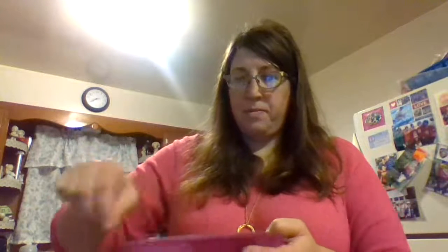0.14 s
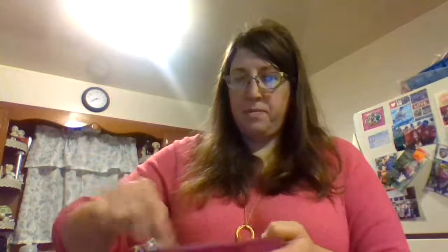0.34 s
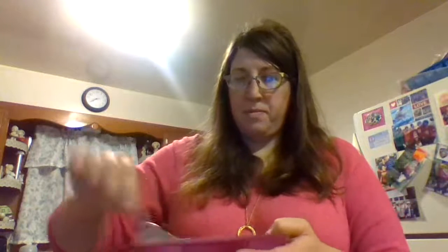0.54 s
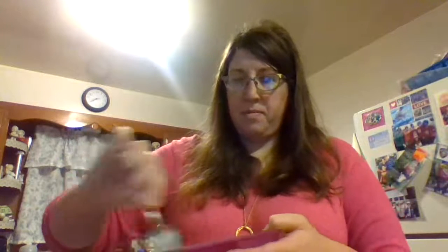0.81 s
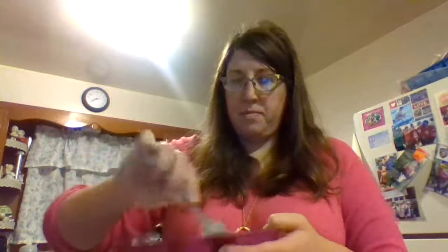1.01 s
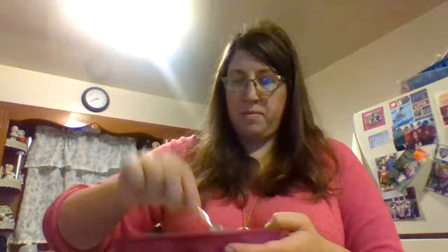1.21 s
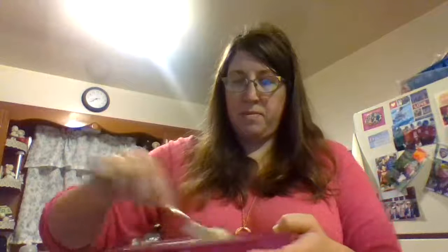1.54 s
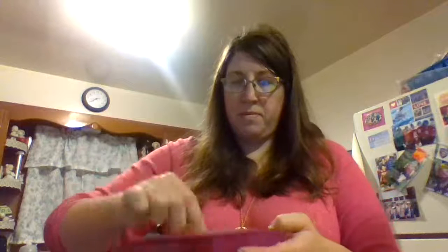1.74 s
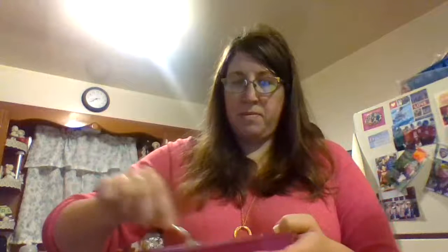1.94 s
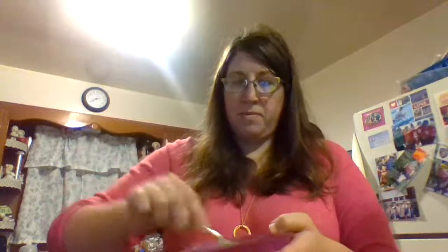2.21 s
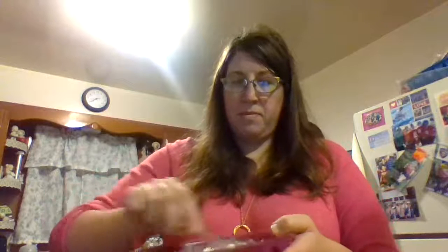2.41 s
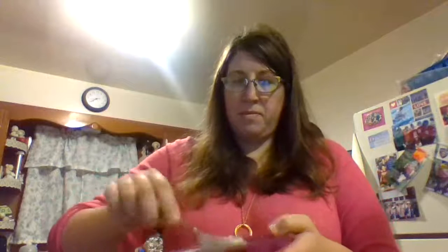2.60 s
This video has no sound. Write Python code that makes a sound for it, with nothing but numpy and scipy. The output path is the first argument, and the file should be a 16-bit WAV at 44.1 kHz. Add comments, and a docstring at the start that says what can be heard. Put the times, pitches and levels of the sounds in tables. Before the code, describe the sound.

A metal spoon scrapes stiff dough in a plastic bowl, close up. Three quick rasping strokes crowd the first 0.5 seconds, with knocks and the strongest bright scrape near 0.35. Strokes follow at 0.65, 0.8-1.1 and 1.3-1.5, a faint one near 1.7, a firm lower one at 1.9, a long one from 2.2 to 2.5, then a knock and brief scrape at 2.7. Tiny pops, short room reflections, faint hum and thin whine.

```python
"""A metal spoon works stiff dough in a plastic bowl, close up: strokes built from dense runs of tiny random slips.
The slips excite bowl colour, a wall resonance, two gliding rasp resonances, the spoon's ring and a bright hiss.
Enveloped noise and damped sines make the spoon knock on the bowl; damped sines pop as air pockets in the dough.
Short decaying noise gives the small kitchen's answer, over coloured room noise and a thin whine of wavering sines."""
import sys
import numpy as np
from scipy import signal
from scipy.fft import rfft, irfft, next_fast_len
from scipy.io import wavfile
from scipy.ndimage import uniform_filter1d, map_coordinates

SR = 44100
rng = np.random.default_rng(int(sys.argv[2]) if len(sys.argv) > 2 else 0)


def file_out(sig):
    """Save sig as 16-bit WAV at sys.argv[1]."""
    # one column per channel
    cols = np.atleast_2d(sig).T
    # limit, then scale
    lim = np.clip(cols, -1, 1)
    pcm = np.round(lim * 32767).astype(np.int16)
    wavfile.write(sys.argv[1], SR, pcm)


N = 121275

# loudness curve of each stroke, one list per stroke: t/s, body level/dB, hiss level/dB
STROKE_CURVES = [
    [(0.0, -51.5, -56), (0.014, -58.5, -57), (0.052, -47.5, -49), (0.066, -45.5, -41), (0.082, -41, -40),
     (0.12, -48, -52), (0.142, -81, -63), (0.15, -55, -51)],
    [(0.172, -49, -43), (0.178, -41, -43.5), (0.19, -42.5, -35.5), (0.202, -41, -44.5), (0.236, -51, -50),
     (0.247, -43, -48)],
    [(0.247, -54, -45), (0.257, -46, -47), (0.295, -34, -34.5), (0.349, -33, -26), (0.357, -31, -25),
     (0.365, -47, -39.5), (0.397, -41, -43), (0.443, -59, -60), (0.47, -56.5, -60)],
    [(0.657, -50, -41.5), (0.667, -40.5, -43), (0.711, -47, -50.5), (0.737, -59, -66), (0.755, -62, -71)],
    [(0.765, -67, -74), (0.777, -50, -48.5), (0.799, -52, -54), (0.819, -43, -44.5), (0.849, -45, -40),
     (0.915, -46.5, -47), (0.983, -41, -41.5), (0.997, -47.5, -47), (1.025, -42.5, -42.5),
     (1.093, -45, -51), (1.13, -86, -80)],
    [(1.28, -78, -59), (1.286, -62, -64), (1.302, -58, -67), (1.38, -49.5, -53.5), (1.388, -37.5, -47.5),
     (1.424, -46.5, -52), (1.46, -41, -41.5), (1.5, -73, -66.5), (1.51, -73, -61)],
    [(1.645, -69, -68), (1.651, -60, -78), (1.669, -61.5, -60), (1.681, -53, -58), (1.717, -66, -60.5),
     (1.733, -46, -45.5), (1.741, -50, -56), (1.785, -60.5, -64)],
    [(1.83, -63, -64), (1.852, -47.5, -64), (1.87, -45, -52), (1.912, -35.5, -46), (1.928, -39.5, -38),
     (1.964, -36, -42), (1.97, -36, -42), (2.016, -52, -57), (2.06, -81, -87)],
    [(2.196, -43.5, -51), (2.208, -41.5, -43), (2.218, -42, -43), (2.292, -44.5, -51), (2.328, -47, -45.5),
     (2.334, -39.5, -47.5), (2.366, -45, -50), (2.462, -39.5, -45), (2.544, -60, -59), (2.558, -78, -82),
     (2.57, -62, -68)],
    [(2.708, -38.5, -50), (2.732, -55.5, -52), (2.75, -49, -52)],
]
# where each stroke touches the bowl, one row per stroke: wall f/Hz, wall width/Hz, wall level/dB,
# rasp start f/Hz, rasp middle f/Hz, rasp end f/Hz, rasp level/dB, upper rasp level re rasp/dB,
# low body level/dB, spoon ring level/dB, fizz level/dB, slip roughness/dB
STROKE_CONTACTS = [ (1130, 230, -4.5, 2550, 2380, 480, 13, -7.5, -17, -3.5, -0.5, -2.5),
                   (1220, 150, 5.5, 2400, 2000, 2150, 14, -4, -4, 4, -5, 4),
                   (1150, 180, 3, 2400, 2190, 1900, 0.5, 5.5, -15, -1.5, -10, 2.2),
                   (1004, 220, 0.5, 2140, 2660, 800, 3.5, -2, -7, 6, 3.5, 1.5),
                   (1180, 320, 4, 2150, 2280, 2190, 10.5, -5.5, -5.5, -2.5, -6, 4),
                   (1002, 78, -7.5, 3640, 2410, 2700, 4.5, -15, -23, -7, -2, 4),
                   (1010, 200, -6, 3500, 2900, 2530, -2.5, -2.5, -15, -7, -7, 4.5),
                   (1040, 260, -3, 2470, 2560, 1670, 2.5, 1.5, -22, -4, -2.5, 4.5),
                   (960, 350, 0.5, 2390, 2730, 2670, 4, -4.5, -8.5, -5, -3.5, 2.5),
                   (1060, 87, 1, 2450, 1800, 4000, 12, -22, -8, -1, -4, 3.5)]
# spoon resonances, shifted by the clinging dough, one list per stroke: f/Hz, width before damping/Hz, level/dB
SPOON_MODES = [
    [(5560, 44, 1), (9720, 43, -13), (11350, 92, 17), (12300, 120, 3)],
    [(5860, 50, -13), (6370, 58, -6), (8200, 190, 3), (10800, 75, -6), (11750, 47, 7.5)],
    [(4500, 34, 8.5), (6380, 99, 3.5), (8800, 290, -6), (9200, 41, -8), (11600, 47, -5), (11270, 64, 6.5),
     (11900, 46, 1.5)],
    [(3840, 26, 8), (4560, 29, 19), (4940, 36, -26), (6900, 23, -17)],
    [(5800, 280, -1), (7080, 51, 0), (9700, 41, -19), (12180, 50, 7.5), (12800, 36, -7)],
    [(6400, 110, -1), (8040, 120, -4), (11100, 39, 3), (11200, 88, 0)],
    [(5050, 76, -8), (6250, 160, -11), (8860, 36, -4)],
    [(4600, 62, 5), (5040, 46, -11), (5650, 36, -17), (9760, 62, 5.5)],
    [(4350, 260, 22), (5150, 38, 2), (8100, 23, -9)],
    [(4860, 40, -2), (6100, 44, -5)],
]
# colour of friction in the bowl: f/Hz, level/dB
BOWL_COLOUR = [(500, -64), (850, -15), (1000, 5.5), (1350, 1.5), (1600, 2), (2400, 2.5), (3300, -0.5),
               (4000, -1), (5200, -14), (8000, -81)]
# colour of the low body of a stroke: f/Hz, level/dB
LOW_BODY_COLOUR = [(100, -40), (260, -50.5), (400, 1), (600, 4.5), (850, 5), (1200, -24)]
# colour of the bright friction hiss: f/Hz, level/dB
HISS_COLOUR = [(2800, -59.5), (4100, -10), (4900, 0.5), (6400, 1.5), (7600, -2.5), (8600, -2.5),
               (10000, -3.5), (13000, -4), (15500, -11.5)]
# colour of the fizz at the very top: f/Hz, level/dB
FIZZ_COLOUR = [(7000, -40), (10200, -3.5), (11300, -2.5), (12200, -3.5), (13500, -5.5), (15500, -13)]
# spoon meets bowl: t/s, thump level/dB, clack level/dB, crack level/dB
KNOCK_EVENTS = [ (0.1764, -66, -27.5, -28.5), (0.246, -35, -33.5, -28.5), (.654, -49, -31, -31),
                (.853, -61, -34, -32), (1.39, -68, -34.5, -42), (1.442, -64, -46, -51),
                (1.4593, -73, -33.5, -49), (1.487, -63, -45, -48), (1.9, -81, -37, -59),
                (1.914, -73, -50, -34), (1.958, -62, -29, -43), (2.1947, -37, -34.5, -33),
                (2.7025, -37, -30.5, -29.5)]
# modes of the bowl's bottom: f/Hz, level/dB, t60/s
BOTTOM_MODES = [(70, -14.5, 0.055), (166, -0.5, .022), (358.6, 0, 0.054), (436, 2.5, 0.019),
                (612, -3.5, .03), (830, -13, 0.074)]
# air pockets opening: t/s, level/dB
POP_EVENTS = [(1.288, -42), (1.5743, -29.5), (1.649, -40)]
# modes of an air pocket: f/Hz, level/dB, t60/s
POCKET_MODES = [(1130, -12.5, 0.052), (1350, -2.5, 0.011), (1820, -0.5, 0.0047), (2280, 4, 0.0039),
                (3180, -6.5, 0.0036)]
# decay of the kitchen: f/Hz, t60/s
KITCHEN_DECAY = [(200, 0.41), (1000, 0.44), (3000, 0.22), (12000, 0.21)]
# colour of the room noise: f/Hz, level/dB
ROOM_COLOUR = [(15, -39), (25, 2.5), (66, 0), (274, -13), (552, -10), (782, -16), (1620, -21), (1750, -23),
               (1950, -18.5), (4620, -25), (5140, -23.5), (5580, -21.5), (7100, -26.5), (7700, -19.5),
               (8810, -22), (9550, -19.5), (11500, -19), (13200, -13.5), (15500, -22)]
# partials of the electronic whine: f/Hz, rms level/dB
WHINE_PARTIALS = [(5206, -73.5), (7811, -72), (8000, -76), (9109, -67), (10411, -91), (11714, -60.5),
                  (13017, -59.5)]

SLIPS_PER_S = 6000
STICK_DB, STICK_PER_S = 0.06, 160  # depth and rate of the stick-slip waver
RASP_WIDTH_HZ, UPPER_RATIO = 634, 1.336  # width of each filter pass; upper rasp pitch over rasp pitch
WALL_GROWS = 0.18  # dB of extra wall ring for each dB of pressure
DOUGH_DAMPING_HZ = 190  # added to each spoon resonance width
PATCHY_DB = 2.5
CLACK_T60_S, CRACK_T60_S, KNOCK_ATTACK_S = .024, .014, .0009
CHATTER_DB, CHATTER_T60_S = -44, .1  # starting level relative to the clack or crack
POP_ATTACK_S = .0003
KITCHEN_DB, FIRST_ECHO_S = -11.5, .003
ROOM_DB = -56.5
WHINE_WAVER_RAD, WHINE_WAVER_PER_S = 0.14, 14
TOP_HZ = 15830


def amp(db):
    """Turn decibels into a gain."""
    return 10 ** (np.asarray(db) / 20)


def unit(x):
    """Bring x to rms 1."""
    return x / np.sqrt(np.mean(x ** 2) + 1e-20)


def along(points, hz):
    """Read a curve of (Hz, value) points on a log frequency axis."""
    point_hz, value = np.transpose(points)
    return np.interp(np.log(hz + 1), np.log(point_hz + 1), value)


def wobble(rate, n):
    """A smooth random curve, rate knots a second."""
    return map_coordinates(rng.standard_normal(2048), [np.arange(n) * rate / SR], mode="wrap")


def filtered(x, response):
    """Shape x with a complex response of frequency."""
    n = x.shape[-1]
    padded = 2 * next_fast_len(n // 2 + 2048)
    spectrum = rfft(x, padded) * response(np.fft.rfftfreq(padded, 1 / SR))
    return irfft(spectrum, padded)[..., :n]


def coloured(x, points):
    """Colour x causally from (Hz, dB) points, at rms 1."""
    def response(hz):
        """Fold the cepstrum forward in time for a minimum-phase response."""
        cepstrum = irfft(np.log(amp(along(points, hz))))
        middle = len(cepstrum) // 2
        cepstrum[1:middle] *= 2
        cepstrum[middle + 1:] = 0
        return np.exp(rfft(cepstrum))
    return unit(filtered(x, response))


def resonant(x, peaks):
    """Ring x through parallel (Hz, width Hz, dB) resonances, at rms 1."""
    def response(hz):
        """Sum the band-pass response of each damped resonator."""
        return sum(amp(db) * 1j * hz * width / (centre ** 2 - hz ** 2 + 1j * hz * width)
                   for centre, width, db in peaks)
    return unit(filtered(x, response))


def ring(modes, t):
    """Sum damped sines from (Hz, dB, t60 s) rows."""
    return sum(amp(db - 60 * t / t60) * np.sin(2 * np.pi * hz * t) for hz, db, t60 in modes)


def add(out, s, x):
    """Mix x into out at s seconds."""
    i = max(round(s * SR), 0)
    out[i:i + len(x)] += x[:max(N - i, 0)]


def scrapes():
    """The spoon drags dough along the wall; sticking and slipping excites bowl and spoon."""
    out = np.zeros(N)
    for curve, contact, spoon in zip(STROKE_CURVES, STROKE_CONTACTS, SPOON_MODES):
        wall_hz, width_hz, wall_db, *path_hz, rasp_db, upper_db, low_db, spoon_db, fizz_db, rough_db = contact
        s, body_db, hiss_db = np.transpose(curve)
        t = np.arange(s[0], s[-1], 1 / SR)

        def rub(colour):
            """A fresh run of slips takes on one colour of friction."""
            return coloured(slips(len(t), rough_db), colour)

        rasp = gliding(rub(BOWL_COLOUR), path_hz)
        rasp = rasp + amp(upper_db) * gliding(rub(BOWL_COLOUR), UPPER_RATIO * np.array(path_hz))

        # the body level stands for pressure: the wall rings more under a harder push
        pressure_db = np.interp(t, s, body_db) - body_db.max()
        wall = resonant(rub(BOWL_COLOUR), [(wall_hz, width_hz, 0)])
        wall = wall * unit(amp(WALL_GROWS * pressure_db))
        low = rub(LOW_BODY_COLOUR)
        body = unit(rub(BOWL_COLOUR) + amp(wall_db) * wall + amp(rasp_db) * rasp + amp(low_db) * low)

        damped = [(hz, width + DOUGH_DAMPING_HZ, db) for hz, width, db in spoon]
        spoon_ring = resonant(rub(HISS_COLOUR), damped)
        fizz = rub(FIZZ_COLOUR)
        hiss = unit(rub(HISS_COLOUR) + amp(spoon_db) * spoon_ring + amp(fizz_db) * fizz)

        stick = unit(amp(STICK_DB * wobble(STICK_PER_S, len(t))))
        body = amp(np.interp(t, s, body_db)) * body
        hiss = amp(np.interp(t, s, hiss_db)) * hiss
        add(out, s[0], stick * (body + hiss))
    return patchy(out)


def slips(n, rough_db):
    """Tiny slips let go at random moments; a few are much larger than the rest."""
    happens = rng.random(N) < SLIPS_PER_S / SR
    size = amp(rough_db * np.minimum(rng.exponential(size=N), 4))
    direction = rng.choice([-1, 1], N)
    return (happens * size * direction)[:n]


def gliding(x, path_hz, count=7):
    """A steep resonance moves through the given pitches, as a cross-fade of fixed ones."""
    place = np.linspace(0, count - 1, len(x))
    stops = np.interp(np.linspace(0, 1, count), np.linspace(0, 1, len(path_hz)), path_hz)
    out = np.zeros(len(x))
    for k, hz in enumerate(stops):
        peak = [(hz, RASP_WIDTH_HZ, 0)]
        steep = resonant(resonant(x, peak), peak)  # two passes steepen the slopes
        out += np.maximum(1 - abs(place - k), 0) * steep
    return unit(out)


def patchy(x):
    """The colour shifts at random over time and frequency as the contact wanders."""
    z = signal.stft(x, nperseg=256)[2]
    field = uniform_filter1d(rng.standard_normal(z.shape), size=3, axis=0)  # smooth over frequency
    field = uniform_filter1d(field, size=14, axis=1)  # smooth over time
    return signal.istft(z * amp(PATCHY_DB * unit(field)), nperseg=256)[1][:len(x)]


def knocks():
    """Each contact thumps the bowl's bottom, clacks its wall, cracks brightly and trails off in a short chatter."""
    out, t = np.zeros(N), np.arange(SR // 4) / SR
    chatter = amp(CHATTER_DB - 60 * t / CHATTER_T60_S)
    cushion = 1 - np.exp(-t / KNOCK_ATTACK_S)  # dough softens the blow
    for s, thump_db, clack_db, crack_db in KNOCK_EVENTS:
        thump = ring(BOTTOM_MODES, t)
        clack = coloured(rng.standard_normal(len(t)), BOWL_COLOUR)
        clack = clack * (amp(-60 * t / CLACK_T60_S) + chatter)
        crack = coloured(rng.standard_normal(len(t)), HISS_COLOUR)
        crack = crack * (amp(-60 * t / CRACK_T60_S) + chatter)
        add(out, s, cushion * (amp(thump_db) * thump + amp(clack_db) * clack + amp(crack_db) * crack))
    return out


def pops():
    """Small air pockets ring briefly as they open when the dough pulls away."""
    out, t = np.zeros(N), np.arange(SR // 10) / SR
    attack = 1 - np.exp(-t / POP_ATTACK_S)
    for s, db in POP_EVENTS:
        add(out, s, amp(db) * ring(POCKET_MODES, t) * attack)
    return out


def kitchen(x):
    """The room answers with short decaying noise, a little different for each stroke as the arm moves."""
    out = np.zeros(N)
    starts = [round(max(curve[0][0], 0) * SR) for curve in STROKE_CURVES[1:]]
    for i, part in zip([0] + starts, np.split(x, starts)):
        hz, t, z = signal.stft(rng.standard_normal(SR // 2), SR, nperseg=256)
        decay = amp(-60 * t / along(KITCHEN_DECAY, hz)[:, None])
        tail = signal.istft(z * decay, SR, nperseg=256)[1]
        tail = tail / np.linalg.norm(tail)
        add(out, i / SR + FIRST_ECHO_S, signal.fftconvolve(part, tail))
    return out


def room_noise():
    """Steady noise of the room: coloured random noise."""
    return amp(ROOM_DB) * coloured(rng.standard_normal(N), ROOM_COLOUR)


def whine():
    """Thin whine of the electronics: steady sines whose phases waver slightly."""
    t, out = np.arange(N) / SR, np.zeros(N)
    for hz, db in WHINE_PARTIALS:
        waver = WHINE_WAVER_RAD * wobble(WHINE_WAVER_PER_S, N)
        out += amp(db) * np.sqrt(2) * np.sin(2 * np.pi * hz * t + waver)
    return out


def scene():
    """Mix the stirring, its room answer and the background; one microphone feeds both channels."""
    stirring = scrapes() + knocks() + pops()
    sound = stirring + amp(KITCHEN_DB) * kitchen(stirring) + room_noise() + whine()
    return np.array([sound, sound])


def record(dry):
    """The recorder keeps nothing above its band limit."""
    return filtered(dry, lambda hz: hz < TOP_HZ)


dry = scene()
out = record(dry)
file_out(out)
```